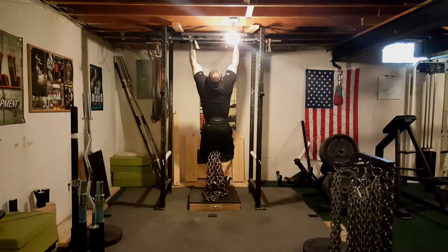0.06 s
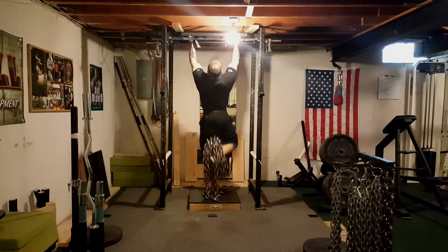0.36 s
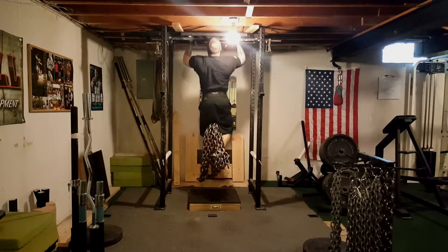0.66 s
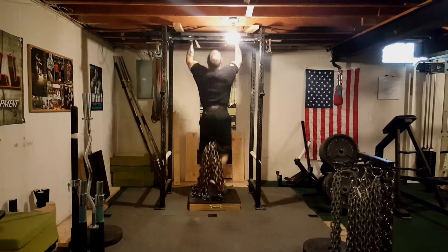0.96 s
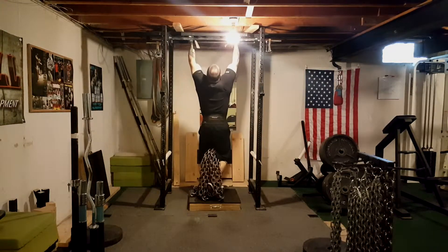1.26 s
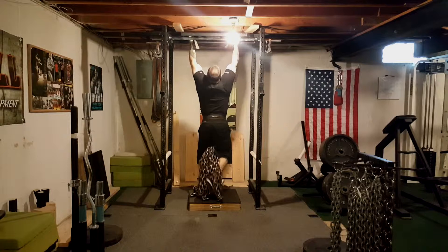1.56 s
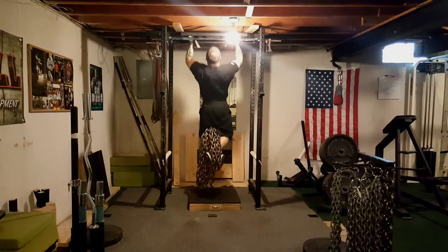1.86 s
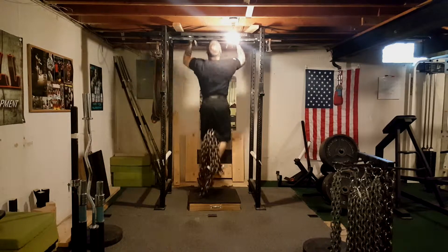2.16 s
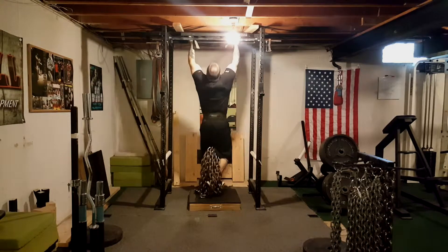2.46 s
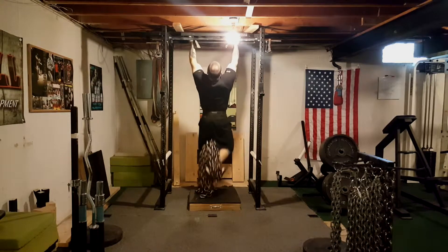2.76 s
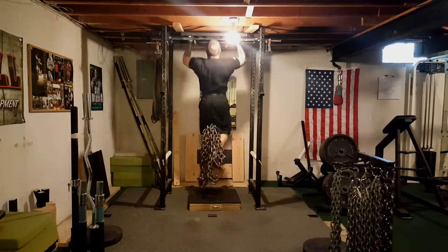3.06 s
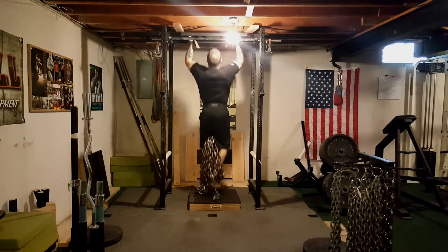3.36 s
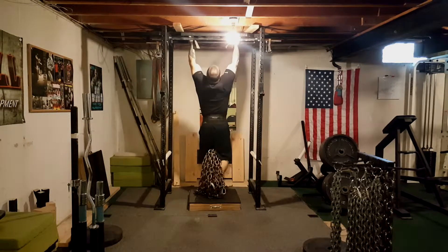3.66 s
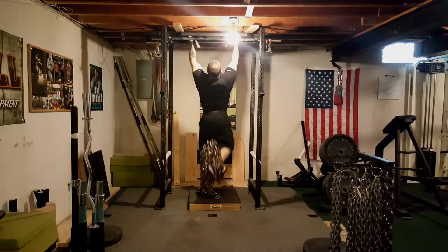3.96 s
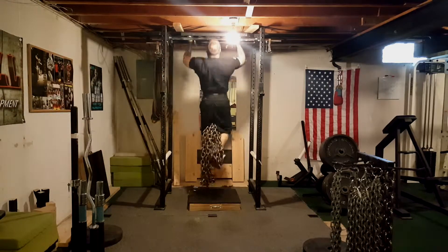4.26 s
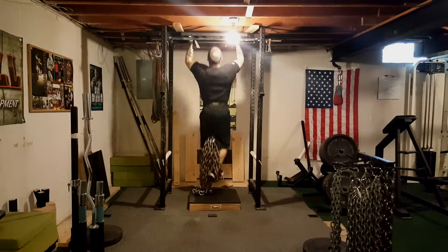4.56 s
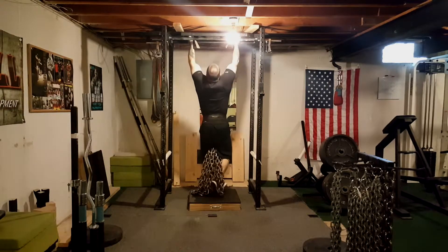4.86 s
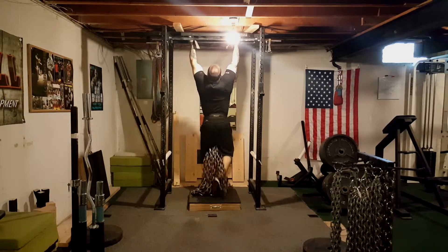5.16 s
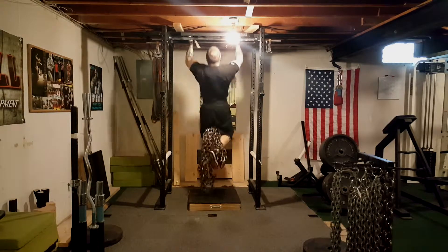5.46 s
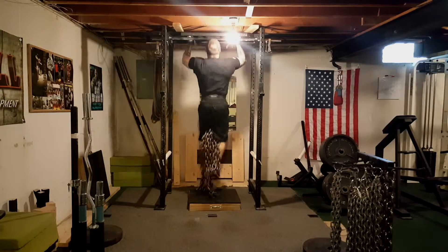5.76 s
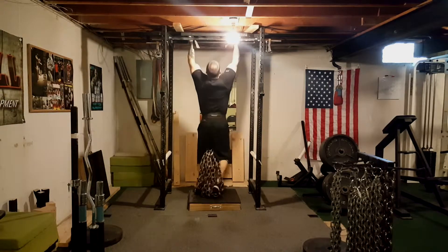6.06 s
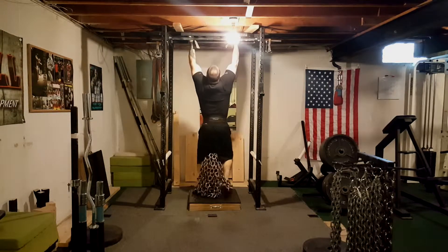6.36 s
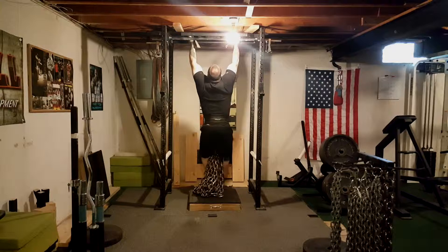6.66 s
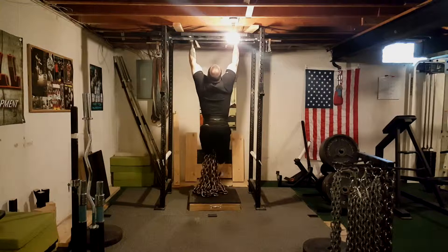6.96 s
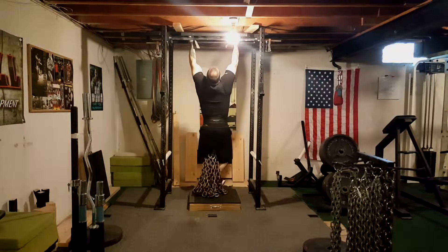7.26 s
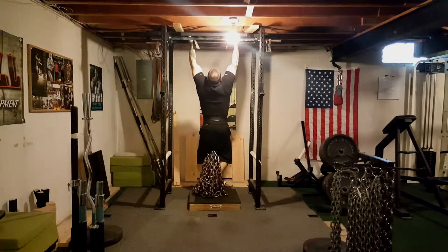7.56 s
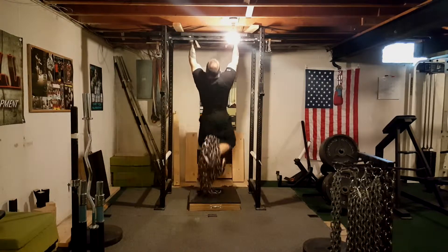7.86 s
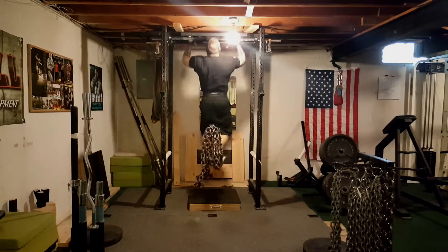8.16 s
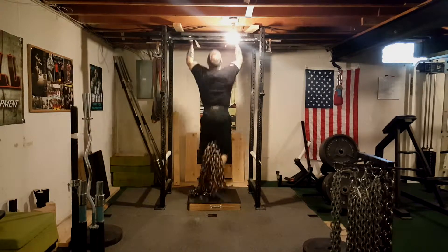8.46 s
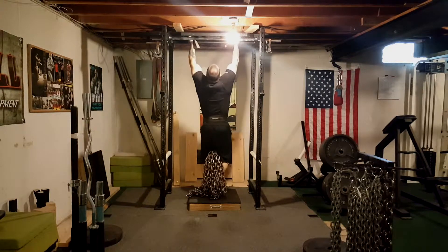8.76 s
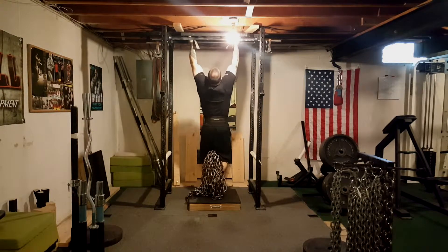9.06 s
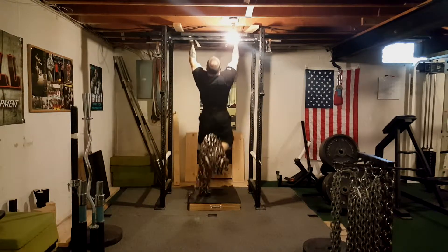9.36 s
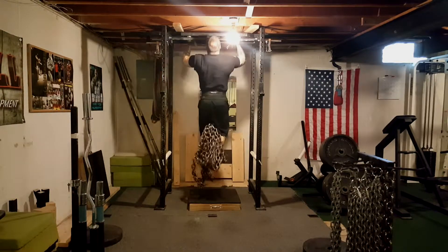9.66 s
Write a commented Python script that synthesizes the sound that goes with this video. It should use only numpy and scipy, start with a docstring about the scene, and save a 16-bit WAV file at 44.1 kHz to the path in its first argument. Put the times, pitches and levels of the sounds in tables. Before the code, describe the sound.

A bundle of steel chains repeatedly lifts with a bright jingle and piles onto a wooden box with dull thuds, in a small room.

```python
"""A basement gym: pull-ups with a bundle of steel chains hanging from a weight belt, several steps away.
As the bundle is hoisted, its links collide and jingle, rasp past each other and clonk hollowly.
At the bottom of each repetition they clatter into a heap on a wooden box, which thuds under the weight.
A low rumble comes and goes, a faint hum fills the room, and the bare walls answer."""
import sys
import numpy as np
from scipy import signal
from scipy.fft import rfft, irfft, next_fast_len
from scipy.io import wavfile
from scipy.ndimage import uniform_filter1d, map_coordinates

SR = 44100
rng = np.random.default_rng(int(sys.argv[2]) if len(sys.argv) > 2 else 0)


def inscribe(sig):
    """Save sig as 16-bit PCM at rate SR to the path in sys.argv[1].

    A 1-D sig is mono; a 2-D sig holds one channel per row.
    Samples are clipped to [-1, 1] before scaling.
    """
    pcm = np.round(np.clip(np.atleast_2d(sig).T, -1, 1) * 32767)
    wavfile.write(sys.argv[1], SR, pcm.astype(np.int16))


N = 428211
CONTROL_STEP = 128  # samples between envelope points

# Ringing modes of a steel link: pitch_hz, level_db, t60_s
MAIN_MODES = [(9090, 0, .13), (9815, -2, .14), (9950, -7.3, .13), (10602, -7, .15)]
DEEPER_MODES = [(8958, 0, .15), (9655, -3.5, .14), (9795, -6, .14), (10445, -6.5, .16)]  # a second, lower-pitched chain
UPPER_MODES = [(13310, 0, .07), (13480, -6, .05), (13960, -.5, .06), (14390, -1.5, .05)]  # the sparkle on top
# Hollow modes of the hanging bundle: pitch_hz, level_db, t60_s
BUNDLE_MODES = [(691, 1.5, 0.045), (769, 2, 0.05), (856, 1, 0.038), (1501, -7.5, 0.064), (1590, -8, 0.03)]
# Resonances of links choked in the heap: pitch_hz, width_hz, level_db
CHOKED_MODES = [(7520, 330, -10), (8290, 330, -3.5), (9020, 300, 0), (9780, 340, -2), (10580, 320, -5),
                (11380, 380, -5.5), (12250, 600, -11), (13900, 1200, -13)]
# Tone colours: frequency_hz, level_db
RASP_SPECTRUM = [(200, -23), (700, -3), (1500, -0.5), (2500, 3.5), (4000, 1.5), (6500, -1.5), (9000, -5),
                 (12000, -11), (15000, -50)]  # sliding links
PUSH_SPECTRUM = [(25, -33), (60, -20.5), (150, -3), (450, -5), (900, -6.5), (1900, -13), (6000, -28)]  # the dull push of a contact in the bundle
BOARD_SPECTRUM = [(30, -44), (80, -11.5), (150, -2), (300, 0.5), (420, -0.5), (570, 3.5), (760, 8.5),
                  (900, 5.5), (1100, -4.5), (1300, -4), (1520, 1), (1900, -9.5), (3200, -15.5),
                  (8000, -29.5)]  # the boards of the box, struck
THUD_SPECTRUM = [(20, -32), (50, -24), (85, -1), (130, 4), (200, -1), (330, -5), (480, -8), (1000, -29)]  # the box under the weight
RUMBLE_SPECTRUM = [(20, -32), (45, -35), (70, -8), (98, -1.5), (140, 2), (200, -5.5), (300, -7),
                   (450, -12.5), (1000, -39)]
AIR_SPECTRUM = [(20, -25), (63, -15), (90, -9), (150, 6.5), (280, 5.5), (450, -1.5), (530, 5), (630, -4.5),
                (780, -4), (900, -11), (1700, -10.5), (4000, -15), (15000, -53)]

# Moves of the bundle: start_s, length_s, ring_db, clatter_db, rasp_db, deeper_chain_share
HOISTS = [(0.38, .28, -14.5, -29, -32, 0.03), (1.785, 0.34, -16.5, -29.5, -32.5, 0.09),
          (2.84, 0.28, -18, -35, -34.5, 0.02), (4.1, .28, -17, -32.5, -34.5, 0),
          (5.33, .35, -17, -33, -32.5, 0.03), (8.09, 0.15, -18, -31, -37.5, 0),
          (9.365, 0.43, -16, -31, -32, 0)]  # it lifts off the box
LANDINGS = [(0.999, 0.16, -18.5, -26.5, -31, 0.29), (2.315, 0.17, -18, -28, -33, 0.072),
            (3.45, 0.15, -17, -26.5, -31.5, 0.039), (4.61, 0.15, -18, -27.5, -29.5, 0.056),
            (5.915, 0.17, -18.5, -28, -30, 0.13), (7.92, 0.037, -20.5, -28.5, -52, 0.66),
            (8.54, 0.098, -18.5, -27, -30.5, 0.089)]  # it piles up on the box
SWAYS = [(0.0, 0.019, -13, -28.5, -26.5, 0.25), (0.09, 0.13, -20, -36.5, -34, .05),
         (0.29, 0.11, -19.5, -40, -27.5, 0.51), (0.76, 0.17, -19.5, -38, -41.5, 0.3),
         (1.32, 0.12, -32.5, -53, -46, 0.078), (2.19, 0.062, -18.5, -42, -39.5, .02),
         (3.2, 0.25, -20.5, -40.5, -37.5, 0.11), (3.85, 0.02, -28, -53, -45, 0.43),
         (3.98, 0.083, -24, -38, -37.5, 0.9), (4.43, 0.12, -20.5, -40.5, -35.5, 0.038),
         (4.86, 0.06, -24.5, -39.5, -39, 0.046), (5.05, 0.028, -23.5, -47.5, -40, 0.024),
         (5.76, 0.12, -17.5, -37, -34, 0.02), (6.14, .13, -22, -33.5, -40, 0.26),
         (6.35, 0.063, -28.5, -44.5, -40, 0.61), (6.68, 0.058, -25, -37, -37.5, 0.069),
         (6.82, 0.19, -17, -31.5, -30, 0.53), (7.21, 0.21, -23.5, -43.5, -33.5, 0.084),
         (7.45, 0.29, -20, -35.5, -36, 0.21), (7.83, 0.078, -17.5, -34.5, -28, 0.28),
         (8.35, 0.15, -22, -34.5, -39.5, 0.042), (9.07, 0.011, -33.5, -54, -63, 0.15)]  # it sways, sinks or is dragged about
# Their envelopes, a row each for ring, clatter and rasp: rise_db_per_s, sag_db_per_s, linger_s, fall_db_per_s
HOIST_ENVELOPES = [(167, 3, 0.01003, 94.5), (186, 9.5, 0.0023, 143), (113, 25, 0.025, 63)]
LANDING_ENVELOPES = [(221.7, 2, .085, 85), (248, 4, 0.0039, 113), (215, 17, 0.075, 120)]
SWAY_ENVELOPES = [(240.4, 2.007, 0.0061, 109), (220, 3.03, 0.0056, 130), (160, 0.98, 0.0019, 103)]
# Swells: start_s, length_s, level_db
SPARKLES = [(0.0, 0.15, -23.5), (0.283, .04, -17), (0.35, 0.072, -22.5), (0.453, .1, -29),
            (0.87, 0.36, -37), (2.07, .02, -32.5), (2.823, .015, -33), (3.146, 0.054, -33),
            (3.45, .22, -38), (4.205, 0.24, -35), (4.484, 0.042, -24), (4.555, 0.29, -30),
            (4.914, 0.029, -26), (5.143, .02, -36.5), (5.238, 0.072, -31), (5.58, 0.028, -31),
            (5.639, .12, -33.5), (5.78, 0.093, -24.5), (6.01, 0.063, -25), (6.145, 0.18, -35),
            (6.386, 0.073, -34), (6.538, 0.052, -36), (6.664, .13, -29), (6.81, 0.18, -21.5),
            (7.038, .04, -26), (7.189, 0.087, -31.5), (7.36, .07, -32.5), (7.448, 0.13, -23.5),
            (7.763, 0.15, -28.5), (8.342, 0.017, -31.5), (8.438, .03, -31), (8.534, 0.21, -29.5),
            (9.396, .02, -37), (9.49, .15, -36)]  # links strike edge-on and light up their upper modes
SCRAPES = [(0.42, 0.21, -36), (0.748, 0.0086, -36), (1.867, 0.099, -47), (1.998, .012, -35),
           (2.91, 0.013, -35.5), (3.06, 0.042, -46.5), (3.817, 0.026, -46), (4.24, 0.13, -41.5),
           (5.471, 0.29, -44), (7.208, .02, -33), (8.075, 0.1, -42), (8.342, 0.011, -42),
           (9.487, 0.092, -39)]  # taut links snag and scrape past each other
THUDS = [(0.98, .14, -30.5), (2.282, .17, -33), (3.42, .15, -31), (4.597, .17, -29.5), (5.879, 0.21, -33),
         (7.893, 0.069, -28), (8.5, .1, -36)]  # the box takes the weight
RUMBLES = [(0.052, 0.29, -27), (0.434, 0.11, -34.5), (1.506, 0.12, -35.5), (1.81, .02, -35.5),
           (1.947, 0.018, -40), (3.233, 0.21, -34.5), (3.996, 0.16, -37), (5.367, 0.025, -32.5),
           (5.7, 0.19, -38), (6.778, 0.22, -35), (7.157, 0.71, -36), (8.391, 0.075, -41),
           (2.769, 0.17, -40), (9.448, 0.092, -37.5)]  # the low rumble comes up
# Single accents: start_s, level_db
CLINKS = [(0.0024, 0.5), (0.117, -1), (0.3663, -6), (0.4278, -4.5), (0.6191, 3), (1.742, -15), (2.112, -6),
          (5.856, 0), (6.355, -9.5), (6.716, -11), (7.0426, 2.5), (7.23, -13), (7.6219, 1), (7.8318, 4),
          (8.865, -17), (9.029, -15), (9.4012, -4)]  # hard steel on steel
CLONKS = [(0.119, -21), (0.384, -12), (0.434, -13.5), (0.577, -18), (0.634, -17), (0.674, -33),
          (1.217, -23), (1.232, -19.5), (1.283, -39), (1.812, -18), (1.928, -17), (1.954, -21),
          (2.002, -16.5), (2.09, -19), (2.146, -21), (2.189, -20.5), (2.886, -19), (2.945, -21),
          (2.978, -24), (3.004, -29), (3.049, -17), (3.083, -24), (3.118, -19), (3.253, -24), (4.133, -19),
          (4.152, -13), (4.222, -23), (4.29, -23), (4.445, -26.5), (5.369, -14), (5.393, -28.5),
          (5.428, -19.5), (5.528, -15.5), (5.633, -31.5), (5.771, -27), (6.811, -17), (6.968, -16.5),
          (7.834, -14), (8.099, -15.5), (8.173, -23), (8.344, -27), (9.482, -15.5), (9.559, -14.5),
          (9.61, -24), (9.673, -30.5)]  # the hanging bundle snaps taut or swings together
KNOCKS = [(0.998, -9.5), (1.011, -12), (1.046, -9.5), (1.069, -14), (1.136, -16.5), (1.176, -27),
          (2.291, -13), (2.324, -11.5), (2.371, -10), (2.426, -11.5), (2.473, -13), (2.5, -18),
          (3.422, -19), (3.44, -12.5), (3.485, -11.5), (3.557, -10.5), (3.571, -15), (4.606, -8),
          (4.651, -13), (4.7, -8.5), (4.75, -11), (5.885, -19), (5.904, -9.5), (5.947, -13.5),
          (5.993, -11.5), (6.026, -12.5), (7.888, -15.5), (7.921, -12), (7.958, -19), (8.499, -13),
          (8.542, -11.5), (8.589, -12), (8.617, -11.5), (8.642, -14), (8.69, -22)]  # heavy lengths of chain hit the box
# Dull bumps: start_s, level_db, pitch_hz
BUMPS = [(0.542, -27, 189), (0.946, -28, 280), (0.968, -21, 300), (1.104, -25, 250), (1.813, -27, 229),
         (2.281, -18, 280), (3.355, -26, 200), (4.563, -19, 305), (4.701, -23, 290), (5.869, -18.5, 292),
         (5.895, -21, 253), (6.633, -23, 335), (6.669, -23, 203), (6.778, -20, 306), (6.785, -19, 208),
         (6.926, -28, 220), (7.12, -31, 250), (8.097, -26.5, 201), (8.371, -27, 332), (8.442, -24, 323),
         (8.59, -20, 300)]

# Partials of the hum: pitch_hz, level_db
HUM_PARTIALS = [(63, -14.5), (263, -6)]
# Fader ride on air and hum together: time_s, level_db
ROOM_TONE_RIDE = [(0, -39.5), (1.1, -45.5), (1.6, -43.5), (2.4, -48), (5.2, -44), (6.1, -44), (6.6, -43),
                  (7.0, -41.5), (7.3, -39), (7.85, -31), (8.05, -54), (9.1, -44.5), (9.7, -41.5)]
# Decay of the wall echoes: frequency_hz, t60_s
WALL_DECAY = [(100, 0.23), (700, 0.32), (3000, 0.18), (9500, 0.26), (15000, 0.12)]


def jingle(ring_db, upper_db, deeper_share):
    """Free links collide and ring; faster motion brings more hits, and a deeper chain adds sparser ones."""
    upper_db = upper_db + 2 * wobble(28)  # the upper modes depend on where the links happen to strike
    share = np.clip(deeper_share, 0, 1)
    hits_per_s = 140 + 620 * amp(ring_db + 17.5)
    attack_s = 0.00017  # the ring builds up over a few quick touches
    main = scattered(contacts(hits_per_s, scatter_db=2.5),
                     lambda: link_ring(MAIN_MODES, 0.0027, uneven_db=2.5, attack_s=attack_s), count=26)
    deeper = scattered(contacts(hits_per_s / 3, scatter_db=3.5),
                       lambda: link_ring(DEEPER_MODES, 0.00265, attack_s=attack_s), count=12)
    upper = scattered(contacts(hits_per_s / 2, scatter_db=5.5),
                      lambda: link_ring(UPPER_MODES, 0.0029), count=10)
    chains = np.sqrt(1 - share) * main + np.sqrt(share) * amp(2.5) * deeper
    return amp(ring_db + 1.5) * chains + amp(upper_db + 0.5) * upper


def link_ring(modes, detune=0.0039, uneven_db=2, attack_s=.0001):
    """One struck link, energy 1: no two are bent and welded quite alike, so tuning and balance vary."""
    t = np.arange(SR // 6) / SR
    hz, db, t60 = np.transpose(modes)[:, :, None]
    offset, strength, phase = rng.standard_normal((3, len(modes), 1))
    waves = np.sin(2 * np.pi * (hz * (1 + detune * offset) * t + phase))
    decays = amp(db + uneven_db * strength - 60 * t / t60)
    ring = np.sum(decays * waves, axis=0) * (1 - np.exp(-t / attack_s))
    return ring / np.linalg.norm(ring)


def bundle_motion():
    """The moves add up to faders for ring, clatter, rasp and sparkle (dB), and the deeper chain's share."""
    power = amp([-40.5, -53, -50.5])[:, None] ** 2  # ring, clatter, rasp: the heap never quite rests
    deeper_power = 0
    kinds = (HOISTS, HOIST_ENVELOPES), (LANDINGS, LANDING_ENVELOPES), (SWAYS, SWAY_ENVELOPES)
    for moves, envelopes in kinds:
        for start, length, *levels, share in moves:
            move = np.array([swell(start, length + linger, db, rise, sag, fall)
                             for db, (rise, sag, linger, fall) in zip(levels, envelopes)])
            power = power + move
            deeper_power = deeper_power + move[0] * np.clip(share, 0, 1)
    sparkles = sum(swell(*row, rise=530, sag=7.4, fall=190) for row in SPARKLES)
    upper_power = power[0] * amp(-25.5) ** 2 + sparkles
    # a short tumble of links follows each knock
    power[1] += sum(swell(start, .009, db - 13.5, rise=2000, sag=60, fall=440) for start, db in KNOCKS)
    power[2] += sum(swell(*row, rise=700, sag=17, fall=500) for row in SCRAPES)
    jerks, jerk_depths_db = wobble(22), (0.4, 0.84, 0.9)  # the bundle moves in small jerks
    ring_db, clatter_db, rasp_db = (fader_db(p) + db * jerks for p, db in zip(power, jerk_depths_db))
    deeper_share = amp(fader_db(deeper_power / power[0])) ** 2
    return ring_db, clatter_db, rasp_db, fader_db(upper_power), deeper_share


def accents():
    """The hardest single hits: clinks of steel, clonks in the bundle, knocks on the box and dull bumps."""
    out, t = np.zeros((2, N)), np.arange(SR // 6) / SR
    for start, db in CLINKS:
        ring = link_ring(MAIN_MODES, detune=0.0031) + 0.042 * link_ring(UPPER_MODES)
        ring *= 1 - np.exp(-t / 0.00033)
        crack = 0.25 * amp(-60 * t / 0.014) * rng.standard_normal(len(t))
        add(out, start, amp(db - 3) * basement(ring / np.abs(ring).max() + crack))
    for start, db in CLONKS:
        add(out, start, amp(db - 2.5) * unit_peak(basement(clonk())))
    for start, db in KNOCKS:
        add(out, start, amp(db) * unit_peak(basement(tap(BOARD_SPECTRUM), direct_db=-10)))
    for start, db, hz in BUMPS:
        bump = amp(-60 * t / 0.033) * (1 - np.exp(-t / 0.0019)) * np.sin(2 * np.pi * hz * t)
        add(out, start, amp(db) * unit_peak(basement(bump)))
    return out


def clatter(level_db):
    """A hanging bundle clatters hollowly; as it piles up, the links drum the boards and clack."""
    piled = np.clip((level_db + 33) / 5, .05, .9)  # louder clatter crossfades towards the heap
    landings = contacts(70 + 170 * amp(level_db + 20), scatter_db=2)
    hollow = scattered(contacts(110, scatter_db=2), clonk, count=7)
    boards = scattered(landings, lambda: tap(BOARD_SPECTRUM), count=10)
    jostled_neighbours = contacts(600, scatter_db=9)
    steel = scattered(landings + jostled_neighbours, choked_clack, count=8)
    heap = amp(2.2) * boards + amp(5) * steel
    return amp(level_db) * (np.sqrt(1 - piled) * amp(1.3) * hollow + np.sqrt(piled) * heap)


def clonk():
    """One contact in the hanging bundle: a dull push and a short hollow ring."""
    ring = link_ring(BUNDLE_MODES, detune=0.016, uneven_db=3)
    push = amp(-5.5) * tap(PUSH_SPECTRUM)
    return ring + np.pad(push, (0, len(ring) - len(push)))


def choked_clack():
    """A link pressed by its neighbours rings only for an instant."""
    t = np.arange(SR // 100) / SR
    return sum(amp(db) * width * np.exp(-np.pi * width * t) * np.sin(2 * np.pi * (hz * t + rng.random()))
               for hz, width, db in CHOKED_MODES)


def rasp(level_db):
    """Links slide over each other in a dense run of tiny ticks."""
    ticks = contacts(2200, scatter_db=5.5)
    return amp(level_db + 3.5) * scattered(ticks, lambda: tap(RASP_SPECTRUM), count=8)


def box_thuds():
    """The box takes the weight at each landing in a burst of bassy taps."""
    load = sum(swell(*row, rise=200, sag=51, fall=220) for row in THUDS)
    body = scattered(contacts(200, scatter_db=0), lambda: tap(THUD_SPECTRUM), count=4)
    return amp(fader_db(load)) * body


def rumble():
    """A low, lumpy rumble swells under the chains and sinks back to a quiet bed."""
    swells = sum(swell(*row, rise=130, sag=2.4, fall=190) for row in RUMBLES)
    lumps = scattered(contacts(400, scatter_db=4), lambda: tap(RUMBLE_SPECTRUM), count=5)
    return amp(fader_db(swells + amp(-46.5) ** 2)) * lumps


def room_tone():
    """Basement air with a faint wavering hum."""
    t = np.arange(N) / SR
    noise = filtered(rng.standard_normal((3, N)), lambda hz: amp(along(AIR_SPECTRUM, hz)))
    air = amp(3) * unit_rms(noise[:2] + 2.8 * noise[2])  # mostly common to both sides
    hum = 0
    for hz, db in HUM_PARTIALS:
        gain = amp(db + 2.5 * wobble(4.5)) * np.sqrt(2)
        hum += gain * np.sin(2 * np.pi * hz * t + 0.54 * wobble(2.26))
    ride_db = np.interp(t, *np.transpose(ROOM_TONE_RIDE))
    return amp(ride_db) * (air + hum)


def basement(sound, direct_db=-5.5):
    """A short sound heard from one new spot: a weak direct path, then wall echoes alike only in the bass."""
    hz, t, noise = signal.stft(rng.standard_normal((3, SR // 4)), SR, nperseg=256)
    common = along([(100, 1.0), (300, 0.83), (800, 0.061), (3000, 0.034)], hz)[:, None]
    echoes = (noise[:2] + common * noise[2]) / np.hypot(1, common)
    decay = amp(-60 * t / along(WALL_DECAY, hz)[:, None])
    path = signal.istft(echoes * decay, SR, nperseg=256)[1]
    path /= np.linalg.norm(path[0])
    path[:, :2] += amp(direct_db) * np.eye(2)  # the direct sound reaches the left side first
    return signal.fftconvolve(sound[None], path / np.linalg.norm(path[0]), axes=1)


def scattered(hits, voice, count):
    """Hits shared out among count voices, each with its own place in the room; stereo, rms 1."""
    owner = rng.integers(count, size=N)
    mix = 0
    for k in range(count):
        own_hits = np.float32(hits * (owner == k))[None]
        mix += signal.oaconvolve(own_hits, np.float32(basement(voice())), axes=1)[:, :N]
    return unit_rms(mix)


def contacts(per_s, scatter_db):
    """Random impacts of alternating sign, their sizes spread by scatter_db; rms 1."""
    chance = np.broadcast_to(per_s / SR, N)
    at = np.flatnonzero(rng.random(N) < chance)
    size = amp(scatter_db * np.clip(rng.standard_normal(N)[at], -2, 2))
    hits = np.zeros(N)
    hits[at] = size * (-1) ** np.arange(len(at)) / np.sqrt(chance[at])  # density leaves loudness alone
    return unit_rms(hits)


def tap(spectrum, size=2048):
    """A tight, minimum-phase hit with the given tone colour; energy 1."""
    gains = amp(along(spectrum, np.fft.rfftfreq(size, 1 / SR)))
    cepstrum = irfft(np.log(gains))
    cepstrum[1:size // 2] *= 2
    cepstrum[size // 2 + 1:] = 0
    hit = irfft(np.exp(rfft(cepstrum)))
    return hit / np.linalg.norm(hit)


def swell(start, length, db, rise, sag, fall):
    """Power envelope that rises to db at start, sags for its length and falls away; slopes in dB/s."""
    t = np.arange(0, N, CONTROL_STEP) / SR - start
    drop_db = rise * np.maximum(-t, 0) + sag * np.clip(t, 0, length) + fall * np.maximum(t - length, 0)
    return amp(db - drop_db) ** 2


def fader_db(power):
    """A power envelope as a level in dB for every sample."""
    return np.interp(np.arange(N), np.arange(0, N, CONTROL_STEP), 10 * np.log10(power + 1e-12))


def wobble(knots_per_s):
    """A smooth random curve."""
    knots = rng.standard_normal(int(N * knots_per_s / SR) + 4)
    return map_coordinates(knots, [np.arange(N) * knots_per_s / SR])


def filtered(x, response):
    """Equalise x with a gain that depends on frequency."""
    size = next_fast_len(N + SR // 2)
    return irfft(rfft(x, size) * response(np.fft.rfftfreq(size, 1 / SR)), size)[..., :N]


def along(points, hz):
    """Read (frequency_hz, value) points on a log axis."""
    frequencies, values = np.transpose(points)
    return np.interp(np.log(hz + 1), np.log(frequencies + 1), values)


def add(out, start_s, sound):
    """Mix in a stereo sound."""
    part = out[:, round(start_s * SR):][:, :sound.shape[1]]
    part += sound[:, :part.shape[1]]


def amp(db):
    """Decibels to gain."""
    return 10 ** (np.asarray(db) / 20)


def unit_rms(x):
    """Scale to rms 1."""
    return x / np.sqrt(np.mean(x ** 2) + 1e-20)


def unit_peak(stereo):
    """Scale so that the mono mix peaks at 1."""
    return stereo / np.abs(stereo.mean(axis=0)).max()


def scene():
    """The moving chains and the box over the sound of the room."""
    ring_db, clatter_db, rasp_db, upper_db, deeper_share = bundle_motion()
    chains = jingle(ring_db, upper_db, deeper_share) + rasp(rasp_db) + clatter(clatter_db)
    return chains + accents() + box_thuds() + rumble() + room_tone()


def record(dry):
    """The left microphone is brighter, gain control holds the loudest clatter down, and the top is cut."""
    balance = [(100, 0), (4000, .1), (9500, 3.0), (14000, 1.1)]  # frequency_hz, left_minus_right_db
    stereo = filtered(dry, lambda hz: amp(along(balance, hz) * np.array([[.5], [-.5]])))
    power = np.abs(uniform_filter1d(np.mean(stereo ** 2, axis=0), size=900))
    ceiling_db, top_hz = -12.5, 14580
    gain = (1 + (power / amp(ceiling_db) ** 2) ** 4) ** (-1 / 8)
    return filtered(stereo * gain, lambda hz: hz < top_hz)


dry = scene()
out = record(dry)
inscribe(out)
```